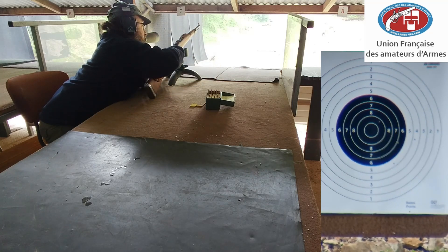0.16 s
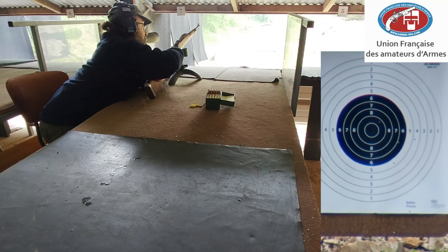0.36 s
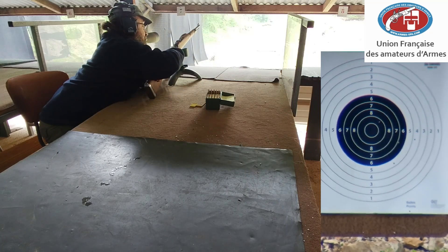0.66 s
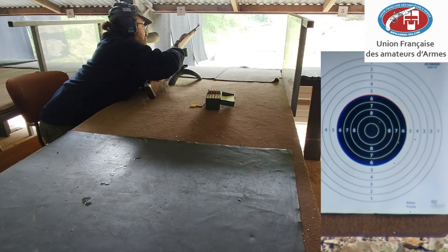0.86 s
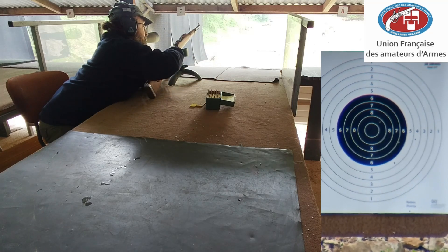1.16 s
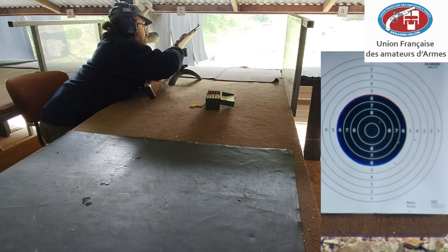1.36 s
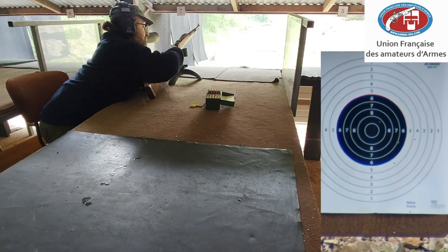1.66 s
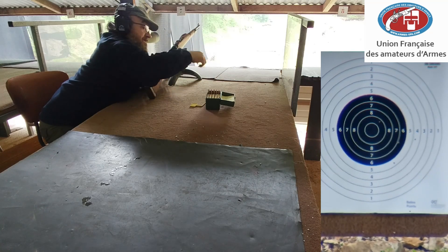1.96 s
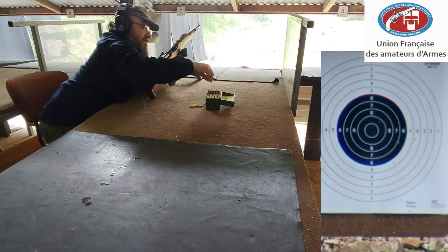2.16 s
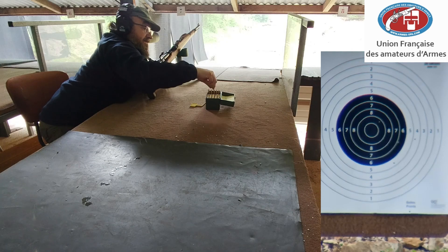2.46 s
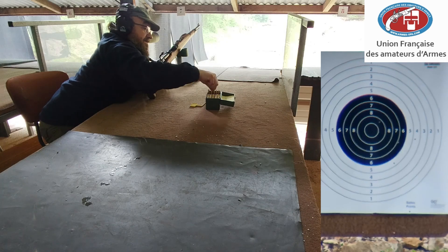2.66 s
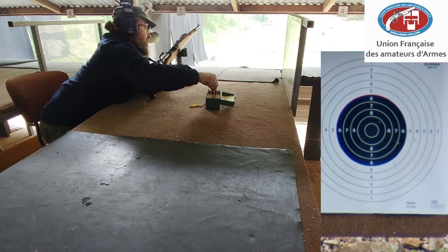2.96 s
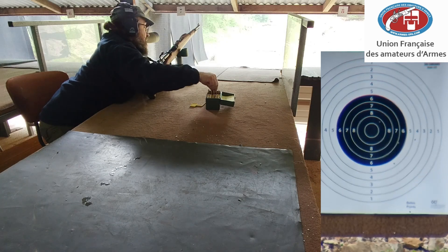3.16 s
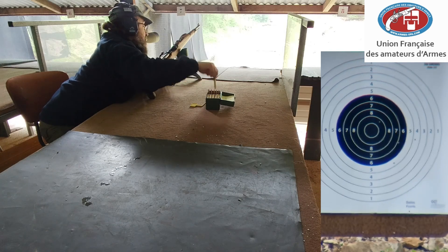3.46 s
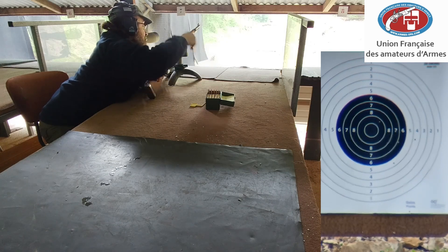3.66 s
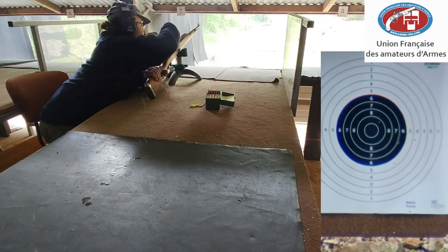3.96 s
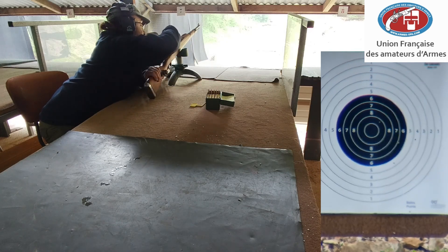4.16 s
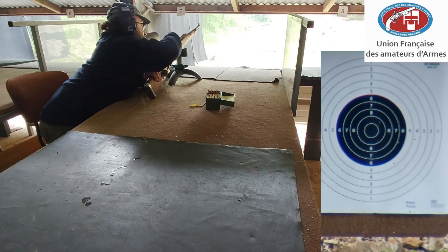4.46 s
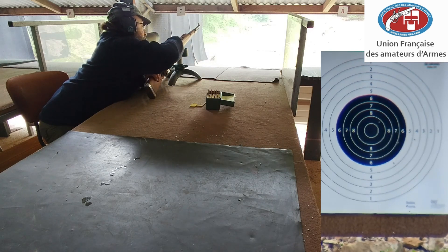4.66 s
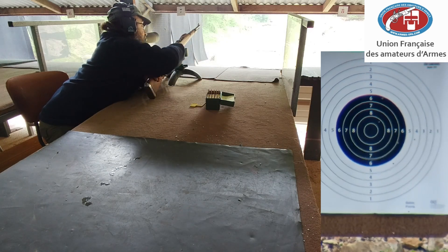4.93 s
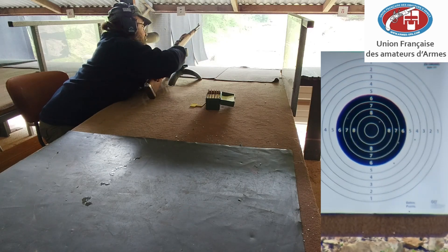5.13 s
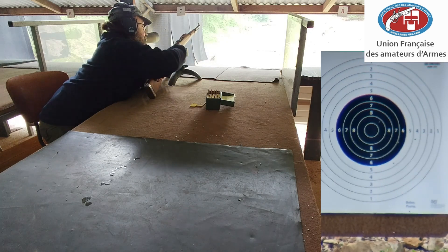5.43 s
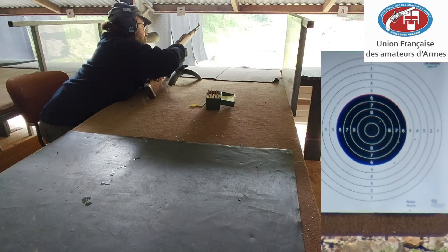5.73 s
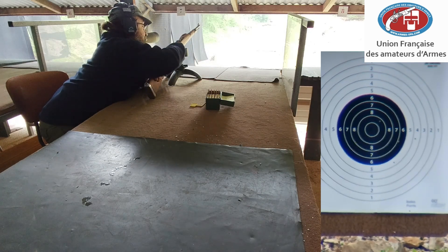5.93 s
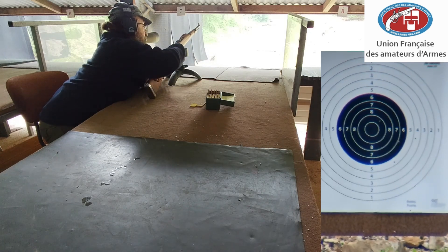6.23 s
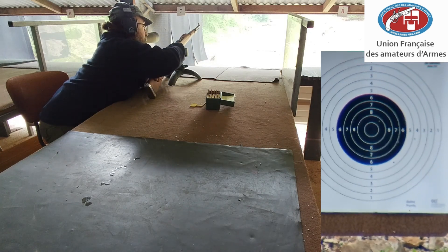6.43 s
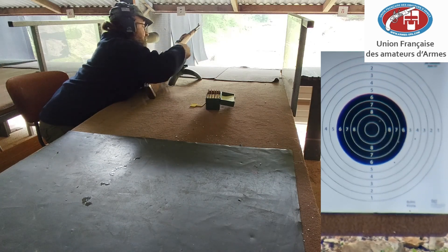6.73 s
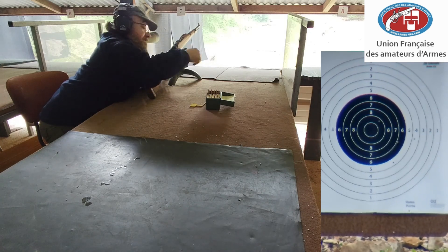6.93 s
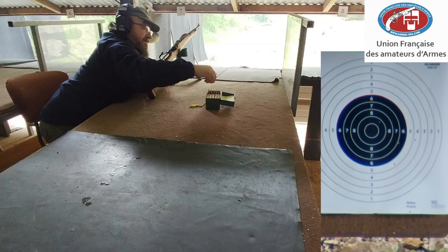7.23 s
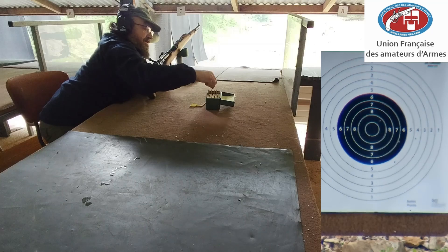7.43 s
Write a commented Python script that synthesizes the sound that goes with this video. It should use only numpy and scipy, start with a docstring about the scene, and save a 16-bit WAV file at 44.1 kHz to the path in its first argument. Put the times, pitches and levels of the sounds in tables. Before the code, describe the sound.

A rifle is loaded by hand under a shed roof: small clicks first, then quiet knocks of cartridges in their box, a brief brass ping and several hard snaps of the bolt. The clicks are centred and bounce briefly off the walls. Birds chirp outside, growing busier in the second half, above a faint steady hum of far traffic. Low wind thumps hit the microphone near the end.

```python
"""A bolt rifle is loaded by hand in an open-fronted shooting shed: steel and brass click and ring.
Each click comes back off a wall and spreads through the shed. Fingers rummage in a resonant box of cases.
Birds whistle and trill in the trees outside, over faint far traffic. Towards the end a breeze
buffets the microphone and stirs the leaves."""
import sys
import numpy as np
from scipy import signal
from scipy.fft import rfft, irfft
from scipy.io import wavfile
from scipy.ndimage import uniform_filter1d

SR = 44100
rng = np.random.default_rng(int(sys.argv[2]) if len(sys.argv) > 2 else 0)


def transcribe(signal):
    """Save signal, clipped to [-1, 1], as a 16-bit WAV file at the path in sys.argv[1]."""
    frames = np.atleast_2d(signal).T
    limited = np.clip(frames, -1, 1)
    pcm = np.round(limited * 32767).astype(np.int16)
    wavfile.write(sys.argv[1], SR, pcm)


N = 334719

# steel and brass contacts: start_s, level_db, body_db_per_octave (below PIVOT_HZ),
# edge_db_per_octave (above it), t60_s, boom_db, favoured_hz
CONTACTS = [(0.194, -54, 6, -23, 0.027, -88, 1200), (0.5374, -48.5, 1.5, 6, 0.032, -83, 955),
            (0.9356, -38, 1, 7.5, 0.038, -63, 1180), (0.9402, -22.5, 4.2, 2, 0.019, -43.5, 1850),
            (1.2486, -40.5, 2, 3.5, 0.025, -51, 940), (1.457, -24, 0, 4, 0.016, -69, 4150),
            (1.5841, -39, 3.5, -4, 0.023, -63, 1730), (1.602, -37.5, 3, -3, 0.029, -76, 5530),
            (1.618, -39, 12, -4, 0.022, -76, 5500), (3.2504, -53.5, 8, 9.5, 0.021, -81, 1170),
            (3.3006, -43, 7, 2, 0.018, -81, 4430), (4.0883, -11, -1, -4, 0.021, -34, 1680),
            (4.304, -44, 4, -0.5, 0.075, -67, 1690), (4.338, -44, -3, 3, 0.038, -96, 1190),
            (4.3942, -38.5, 6, -2, 0.08, -46, 1270), (4.449, -27.5, -17, -7, 0.12, -91, 4210),
            (4.459, -21, 3.5, 9.5, 0.023, -36.5, 3940), (4.492, -13.5, -6, 4, 0.02, -60, 4130),
            (5.091, -42, -1.5, -2, 0.091, -87.5, 3220), (5.146, -4.5, -1, 2.7, 0.029, -36, 3760),
            (5.3464, -4.5, -0.94, 8, 0.019, -36, 1462), (5.5671, -8.5, -0.2, 3, 0.03, -29.5, 1938),
            (5.768, -41.5, 3.5, -6, 0.061, -80, 1250), (6.1064, -10.5, -2.3, 1.6, 0.048, -34, 882),
            (6.343, -22, -1.7, 2.5, 0.015, -35, 1336), (6.5532, -12.5, -7.5, 1, 0.024, -36, 3720),
            (6.5643, -26, 8.5, 8, 0.024, -37, 2600), (6.5932, -19, -1, 6.5, 0.027, -37, 3380)]
# modes of action and cases: pitch_hz, level_db, t60_ratio
ACTION_MODES = [(874, -2.5, 4.8), (1335, 5, 2.1), (1828, 0.5, 2), (2204, -6, 2.2), (3150, -9.5, 2.6),
                (3568, -3, 1.2), (3687, -23.5, 3.2), (4305, -6, 0.77), (5700, -7, 2.3), (6240, 0.5, .9),
                (7450, -27, 0.89), (8370, -4, 0.95), (9270, -2, 0.82), (15400, -15, 0.97)]
# average contact spectrum: freq_hz, gain_db
CONTACT_COLOUR = [(750, -25), (1600, -14), (3500, -8.5), (7000, -12), (14500, -16)]
# clatter noise: freq_hz, density_db
CLATTER_SPECTRUM = [(500, -1), (900, 2.5), (1900, -6), (2600, -10), (3800, -8.5), (8500, -14.5),
                    (11000, -24.5), (15000, -32)]
# loose brass case: pitch_hz, level_db, t60_s
CASE_MODES = [(4220, -1.5, 0.1)]
# strikes on it: start_s, level_db
CASE_STRIKES = [(4.45, -50.5), (4.493, -25.5)]
# hands on box, table and sleeve: start_s, hold_s, box_db, table_db, sleeve_db
HAND_STROKES = [(1.614, 0.024, -52.5, -60.5, -73), (2.007, .18, -83, -59.5, -95),
                (2.632, 0.0058, -52.5, -59, -82), (2.753, 0.01, -54, -57, -84),
                (3.133, 0.055, -52, -54.5, -78), (3.231, 0.12, -56.5, -63.5, -97),
                (3.396, 0.027, -56, -62, -89), (3.51, 0.0042, -56, -60, -65.5),
                (7.581, .03, -51, -58, -82.5)]
# cases against the box: start_s, level_db
BOX_KNOCKS = [(2.612, -56), (2.637, -36.5), (2.718, -41), (3.124, -37), (3.148, -31), (3.219, -35.5),
              (3.327, -37), (3.391, -40), (3.523, -38)]
# box resonances: pitch_hz, width_hz, gain_db
BOX_MODES = [(545, 78, 1), (883, 180, -3), (1222, 156, 0), (1670, 490, -6), (3000, 2000, -18)]
# shed reverberation: freq_hz, level_db, t60_s
SHED_DECAY = [(185.8, 1.5, 0.26), (400, 8, 0.27), (800, 1.5, 0.31), (1590, 2.5, 0.32), (3200, 0, 0.42),
              (6140, -1.5, 0.35), (10150, 6, 0.34), (11700, -3.5, 0.27), (14540, -13.5, 0.17)]
# trill motifs: offset_s, length_s, from_hz, to_hz, level_db
HIGH_MOTIF = [(0, 0.031, 7350, 5210, -54), (0.021, 0.0098, 5260, 4100, -53),
              (0.033, .016, 5800, 3650, -47.5)]
LOW_MOTIF = [(0, 0.014, 5880, 3990, -48.5), (0.01, 0.026, 4610, 3010, -51), (0.046, .016, 3500, 2600, -47)]
# near bird, around the low trill: start_s, length_s, from_hz, to_hz, level_db
FLOURISHES = [(5.501, 0.055, 4100, 3956, -42.5), (5.7, 0.044, 3600, 4390, -45.5),
              (5.729, 0.046, 3300, 2630, -49), (5.786, 0.12, 3300, 2710, -52.5),
              (6.762, 0.036, 2820, 3187, -50), (6.785, 0.0182, 3110, 2290, -48.5),
              (6.802, 0.033, 3036, 3050, -45), (6.83, 0.03, 2360, 2160, -58),
              (6.852, 0.028, 3190, 4170, -49), (6.884, 0.031, 4100, 3510, -44.5),
              (6.924, 0.0367, 2300, 1898, -53)]
# far birds: start_s, length_s, pitch_hz, level_db
FAR_WHISTLES = [(0.192, 0.065, 2980, -74), (0.8, 0.11, 7450, -84), (1.336, .077, 5290, -77),
                (1.663, 0.044, 5870, -63), (1.8, 0.092, 4450, -73), (1.865, .06, 7500, -81),
                (1.995, 0.22, 4330, -79), (2.02, .059, 8500, -80), (2.19, .12, 8100, -82),
                (2.45, .11, 8140, -80), (2.822, 0.16, 5050, -69)]
# timed wind buffets on the microphone: centre_s, level_db
TIMED_EDDIES = [(5.766, -33.5), (5.823, -30), (5.868, -29), (5.894, -26.5), (6.069, -26), (6.2, -26.5),
                (6.243, -29.5), (6.34, -21.5), (6.429, -20.5), (6.475, -26), (6.543, -23), (6.574, -23),
                (6.673, -32), (6.772, -32.5), (6.901, -36), (7.064, -27.5), (7.183, -38), (7.288, -27),
                (7.423, -24.5), (7.455, -27), (7.508, -34.5)]
# wind rumble: time_s, level_db
GUST_CURVE = [(0.0, -61), (0.49, -68), (1.99, -63.5), (2.34, -56.5), (2.96, -61.5), (3.83, -61.5),
              (4.73, -65.5), (5.689, -55.5), (6.47, -46), (6.93, -59), (7.59, -54.5)]
# leaf rustle: time_s, level_db
RUSTLE_CURVE = [(6.9, -91), (7.2, -74.5), (7.4, -63), (7.59, -74)]
# background noise: freq_hz, density_db
AIR_SPECTRUM = [(35, -31), (60, -7.5), (208, -10.5), (270, -9.5), (334, -8.5), (644, -11), (874, -14.5),
                (1190, -17), (1300, -21), (1500, -22), (2350, -25), (4320, -27.5), (6760, -38),
                (15000, -59), (16500, -60.5)]
# its left-right likeness: freq_hz, correlation
AIR_CORRELATION = [(60, 0.19), (240, 0.73), (950, 0.21), (3770, 0.06), (15000, 0.24)]

PIVOT_HZ, BLUR_S = 3500, .006
PITCH_SCATTER_RATIO, FAVOURED_WIDTH_RATIO = .05, .06
POSES = 3   # the rifle shifts between contacts: one shed response per pose
STROKE_RISE_DB_PER_S, STROKE_FALL_DB_PER_S, TAPS_PER_S = 268, 302, 700
ECHO_S, ECHO_DB = .034, -13
SHED_DB, EARLY_DB, SWELL_S, SWELL_DEPTH = 3.5, -10, .0047, .8
HIGH_TRILL_START_S, HIGH_TRILL_PERIOD_S, HIGH_TRILL_REPEATS = 4.625, .1005, 5
LOW_TRILL_START_S, LOW_TRILL_PERIOD_S, LOW_TRILL_REPEATS = 5.854, .0672, 11
WHISTLE_WAVER_RATIO, CHIRP_WAVER_RATIO = .011, .033
TREES_T60_S, TREES_DB = .5, 4.5
EDDY_HZ, EDDY_SPREAD_RATIO = 122.2, .22
SCATTERED_EDDY_SPAN_S, SCATTERED_EDDY_COUNT, SCATTERED_EDDY_DB = (5.75, 7.55), 20, -31
WAKE_DELAY_S, WAKE_DB, WAKE_PITCH_RATIO = .0161, -10.5, .75
DEEP_RUMBLE_DB, AIR_DB = -55, -56
OVERLOAD_LEVEL, CUTOFF_HZ = .95, 17000


def from_db(db):
    """dB to gain."""
    return 10 ** (np.asarray(db) / 20)


def unit_rms(x):
    """Scale to rms 1."""
    return x / np.sqrt(np.mean(x ** 2) + 1e-20)


def at_hz(table, hz, column=1):
    """Table lookup on a log-frequency axis."""
    table = np.array(table)
    return np.interp(np.log(hz), np.log(table[:, 0]), table[:, column])


def band(x, low_hz, high_hz):
    """Butterworth band-pass."""
    sos = signal.butter(2, [low_hz, min(high_hz, .45 * SR)], "band", fs=SR, output="sos")
    return signal.sosfilt(sos, x)


def add(track, start_s, sound):
    """Mix in at start_s."""
    i = round(start_s * SR)
    track[i:i + len(sound)] += sound[:N - i]


def spread(x, response):
    """Convolve with a stereo response."""
    return signal.fftconvolve(x[None], response, axes=1)[:, :N]


def rifle_clicks():
    """Metal contacts clatter and ring. Returns direct sound and per-pose shed feeds with table boom."""
    direct, to_shed = np.zeros(N), np.zeros((POSES, N))
    n = round(.12 * SR)
    t = np.arange(n) / SR
    mode_hz, mode_db, t60_ratio = np.transpose(ACTION_MODES)
    bin_hz = np.maximum(np.fft.rfftfreq(n, 1 / SR), 1)
    for k, (start_s, level_db, body, edge, t60_s, boom_db, favoured_hz) in enumerate(CONTACTS):
        tint = []
        for hz, db in CONTACT_COLOUR:
            octaves = np.log2(hz / PIVOT_HZ)
            tint.append((hz, db + edge * max(octaves, 0) + body * max(-octaves, 0)))

        detune, strength, phase = rng.random((3, len(ACTION_MODES)))
        ring_hz = mode_hz * (1 + PITCH_SCATTER_RATIO * (detune - .5))   # loose parts vary in pitch
        ring_db = mode_db + 13 * (strength - .5) + at_hz(tint, ring_hz)
        ring_db += 8 * np.exp(-(np.log(ring_hz / favoured_hz) / FAVOURED_WIDTH_RATIO) ** 2)
        decays = from_db(ring_db - 60 * t[:, None] / (t60_s * t60_ratio))
        rings = np.sum(decays * np.sin(2 * np.pi * (ring_hz * t[:, None] + phase)), axis=1)

        clatter_db = at_hz(tint, bin_hz) + at_hz(CLATTER_SPECTRUM, bin_hz)
        clatter_db += 7.4 * np.exp(-(np.log(bin_hz / favoured_hz) / .086) ** 2)
        spectrum = from_db(clatter_db) * np.minimum(bin_hz / 500, 1) ** 2
        clatter = irfft(rfft(rng.standard_normal(n)) * spectrum, n) * from_db(-60 * t / (1.226 * t60_s))
        jolts_db = 3.5 * np.interp(t, t[::70], rng.standard_normal(len(t[::70])))
        attack = np.minimum(t / .002, 1) ** 2 * from_db(jolts_db)
        add(direct, start_s, from_db(level_db) * attack * (from_db(-4.5) * rings + from_db(18.5) * clatter))

        # over all directions the clatter averages to a smooth spectrum and the rings blur
        energy = np.sum((attack * from_db(-60 * t / (1.1 * t60_s))) ** 2)
        smooth = from_db(19) * np.roll(irfft(spectrum, n), 60) * np.sqrt(energy)
        blurred = from_db(-2.5) * attack * np.exp(-t / BLUR_S) * rings
        boom = np.sin(2 * np.pi * 225 * t) + .075 * np.sin(2 * np.pi * 330 * t)
        boom *= from_db(boom_db - 60 * t / .056)
        add(to_shed[k % POSES], start_s, from_db(level_db) * (blurred + smooth) + boom)
    return direct, to_shed


def case_pings():
    """A struck brass case rings freely."""
    out, t = np.zeros(N), np.arange(round(.4 * SR)) / SR
    for start_s, level_db in CASE_STRIKES:
        for hz, db, t60_s in CASE_MODES:
            add(out, start_s, from_db(level_db + db - 60 * t / t60_s) * np.sin(2 * np.pi * hz * t))
    return out


def rummaging():
    """Taps and knocks drive the box modes; hands shuffle on the table, a sleeve hisses."""
    taps = (rng.random(N) < TAPS_PER_S / SR) * from_db(4.8 * np.minimum(rng.exponential(1, N), 3.5))
    taps = unit_rms(taps * rng.choice([-1, 1], N))
    shuffle = unit_rms(band(rng.standard_normal(N), 189, 434))
    sleeve = unit_rms(band(rng.standard_normal(N), 7700, 11600))
    force, out, t = np.full(N, 1e-18), np.zeros(N), np.arange(N) / SR
    for start_s, hold_s, box_db, table_db, sleeve_db in HAND_STROKES:
        rise_db = STROKE_RISE_DB_PER_S * np.clip(start_s - t, 0, 1)
        fall_db = STROKE_FALL_DB_PER_S * np.clip(t - start_s - hold_s, 0, 1)
        stroke = from_db(-rise_db - fall_db)
        force += stroke * from_db(box_db + 12.5) * taps
        out += stroke * (from_db(table_db) * shuffle + from_db(sleeve_db) * sleeve)
    for start_s, level_db in BOX_KNOCKS:
        scuff = rng.standard_normal(260) * np.hanning(260)
        add(force, start_s, from_db(level_db + 8.5) * scuff)
    for k, (hz, width_hz, db) in enumerate(BOX_MODES):
        out += (-1) ** k * from_db(db) * signal.lfilter(*signal.iirpeak(hz, hz / width_hz, SR), force)
    return out


def wall_echo(x):
    """One bright reflection, stronger on the left."""
    bright = x + 1.5 * band(x, 7600, 9800)
    return from_db(ECHO_DB + np.array([[1.5], [-1.5]])) * np.roll(bright, round(ECHO_S * SR))


def shed_response():
    """Faint early reflections; from the wall echo on, a tail that swells and dies band by band."""
    t = np.arange(round(.6 * SR)) / SR
    after_s = np.maximum(t - ECHO_S, 0)
    edges_hz, tail = 140 * 2 ** np.arange(0, 7.6, .5), 0
    shared, own = rng.standard_normal((2, len(t))), rng.standard_normal((2, 2, len(t)))
    for k, (low_hz, high_hz) in enumerate(zip(edges_hz, edges_hz[1:])):
        hz = np.sqrt(low_hz * high_hz)
        noise = unit_rms(shared[k % 2] * 700 / hz + own[k % 2])   # long waves reach both sides alike
        decay = from_db(at_hz(SHED_DECAY, hz) - 60 * after_s / at_hz(SHED_DECAY, hz, column=2))
        tail += decay * band(noise, low_hz, high_hz)
    tail = from_db(SHED_DB) * tail / np.sqrt(np.mean(np.sum(tail ** 2, axis=1)))
    swell = 1 - SWELL_DEPTH * np.cos(after_s / SWELL_S) * np.exp(-after_s / (2 * SWELL_S))
    return tail * np.where(t < ECHO_S, from_db(EARLY_DB), swell)


def trill(motif, start_s, period_s, repeats):
    """Notes of a repeated bird motif, slightly uneven in level."""
    return [(start_s + k * period_s + offset_s, *glide, db + rng.normal(0, .31), CHIRP_WAVER_RATIO)
            for k in range(repeats) for offset_s, *glide, db in motif]


def birds():
    """Gliding chirps and held whistles, direct and scattered by the trees."""
    notes = [(*note, CHIRP_WAVER_RATIO) for note in FLOURISHES]
    notes += [(s, length_s, hz, hz, db, WHISTLE_WAVER_RATIO) for s, length_s, hz, db in FAR_WHISTLES]
    notes += trill(HIGH_MOTIF, HIGH_TRILL_START_S, HIGH_TRILL_PERIOD_S, HIGH_TRILL_REPEATS)
    notes += trill(LOW_MOTIF, LOW_TRILL_START_S, LOW_TRILL_PERIOD_S, LOW_TRILL_REPEATS)
    song = np.zeros(N)
    for start_s, length_s, from_hz, to_hz, level_db, waver_ratio in notes:
        n = round(length_s * SR)
        waver = waver_ratio * unit_rms(uniform_filter1d(rng.standard_normal(n), size=150))
        pitch_hz = np.geomspace(from_hz, to_hz, n) * (1 + waver)
        flutter_db = 3.8 * unit_rms(uniform_filter1d(rng.standard_normal(n), size=90))   # moving leaves
        envelope = from_db(level_db + flutter_db) * np.sqrt(np.hanning(n))
        add(song, start_s, envelope * np.sin(2 * np.pi * np.cumsum(pitch_hz) / SR))
    t = np.arange(SR) / SR
    trees = rng.standard_normal((2, SR)) * from_db(-60 * t / TREES_T60_S) * (1 - np.exp(-t / .0037))
    trees /= np.sqrt(np.mean(np.sum(trees ** 2, axis=1)))
    return song + from_db(TREES_DB) * spread(song, trees)


def wind():
    """Eddies of a cycle or two hit the microphone, each trailing a wake, over a stereo rumble."""
    eddies, t = np.zeros(N), np.arange(-.03, .03, 1 / SR)
    scattered = [(rng.uniform(*SCATTERED_EDDY_SPAN_S), SCATTERED_EDDY_DB + rng.normal(0, 1.5))
                 for _ in range(SCATTERED_EDDY_COUNT)]
    for centre_s, level_db in TIMED_EDDIES + scattered:
        eddy_hz = EDDY_HZ * (1 + EDDY_SPREAD_RATIO * rng.standard_normal())
        for delay_s, db, hz in ((0, 0, eddy_hz), (WAKE_DELAY_S, WAKE_DB, eddy_hz * WAKE_PITCH_RATIO)):
            pulse = np.exp(-.5 * (t * hz / .41) ** 2) * np.cos(2 * np.pi * (hz * t + rng.random()))
            add(eddies, centre_s + delay_s + t[0], from_db(level_db + db) * pulse)
    gust_db = np.interp(np.arange(N) / SR, *np.transpose(GUST_CURVE))
    shared, own = rng.standard_normal(N), rng.standard_normal((2, N))
    upper = from_db(gust_db) * unit_rms(band(shared, 33, 100))
    deep = from_db(DEEP_RUMBLE_DB + .7 * (gust_db + 60)) * unit_rms(band(.88 * shared + own, 8.3, 40))
    return band(eddies, 65, 900) + upper + deep


def leaves():
    """Leaves rustle in the breeze."""
    level_db = np.interp(np.arange(N) / SR, *np.transpose(RUSTLE_CURVE))
    return from_db(level_db) * unit_rms(band(rng.standard_normal((2, N)), 2500, 9500))


def air():
    """Steady foliage, far traffic and microphone hiss: third-octave stereo noise."""
    edges_hz, out = 60 * 2 ** np.arange(0, 8.4, 1 / 3), 0
    white = rng.standard_normal((2, 2, N))
    for k, (low_hz, high_hz) in enumerate(zip(edges_hz, edges_hz[1:])):
        hz = np.sqrt(low_hz * high_hz)
        mid, side = band(white[k % 2], low_hz, high_hz)
        correlation = at_hz(AIR_CORRELATION, hz)
        stereo = np.sqrt(1 + correlation) * mid + np.sqrt(1 - correlation) * side * [[1], [-1]]
        out += from_db(at_hz(AIR_SPECTRUM, hz)) * stereo
    return from_db(AIR_DB) * unit_rms(out)


def scene():
    """Rifle and hands centred in the shed; birds, wind and foliage outside."""
    clicks, to_shed = rifle_clicks()
    pings, box, shed = case_pings(), rummaging(), shed_response()
    rifle = clicks + pings
    tail = spread(from_db(-5.5) * pings, shed) + sum(spread(feed, shed_response()) for feed in to_shed)
    hands = from_db(-.5) * (box + spread(box, shed[:, round(ECHO_S * SR):]))
    return rifle + wall_echo(rifle) + tail + hands + leaves() + birds() + wind() + air()


def record(dry):
    """Microphone: 12.6 kHz dip, 15.3 kHz lift, soft clip, steep low-pass."""
    dipped = dry - .9 * signal.lfilter(*signal.iirpeak(12600, 3.5, SR), dry)
    lifted = dipped + 1.5 * signal.lfilter(*signal.iirpeak(15300, 7.5, SR), dipped)
    rounded = lifted / (1 + (lifted / OVERLOAD_LEVEL) ** 4) ** .25
    return signal.sosfilt(signal.cheby2(18, 70, CUTOFF_HZ, fs=SR, output="sos"), rounded)


dry = scene()
out = record(dry)
transcribe(out)
```